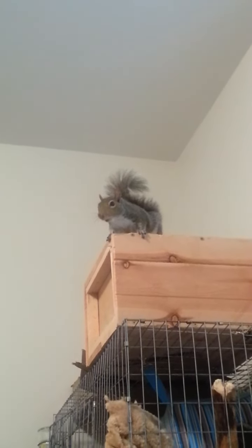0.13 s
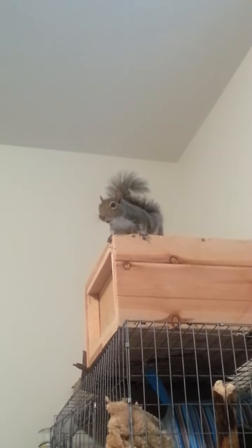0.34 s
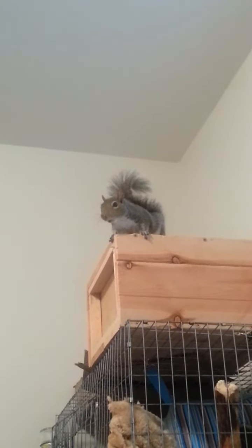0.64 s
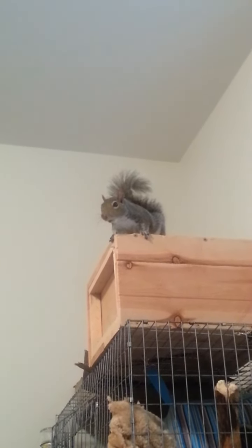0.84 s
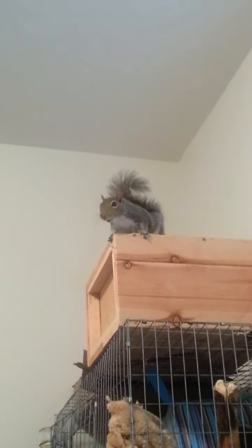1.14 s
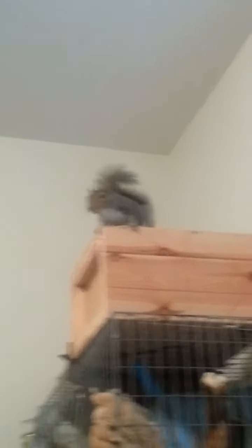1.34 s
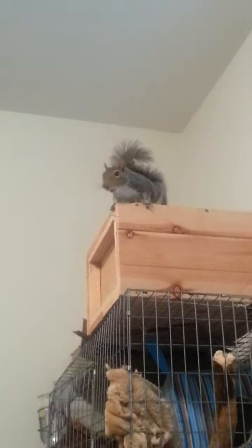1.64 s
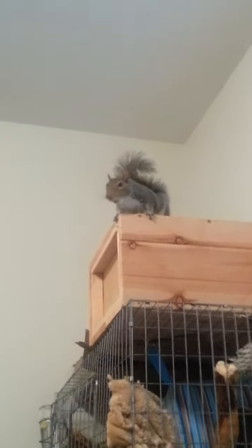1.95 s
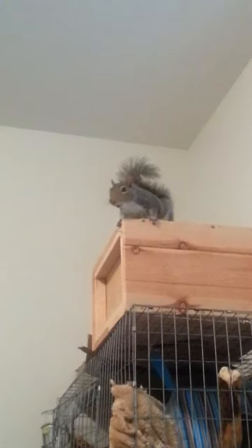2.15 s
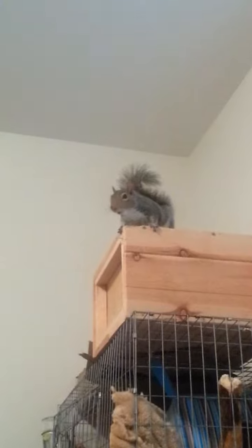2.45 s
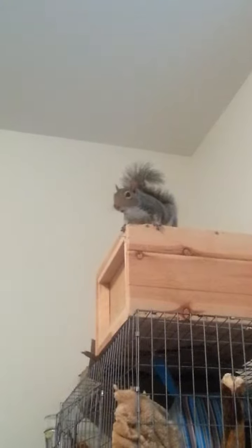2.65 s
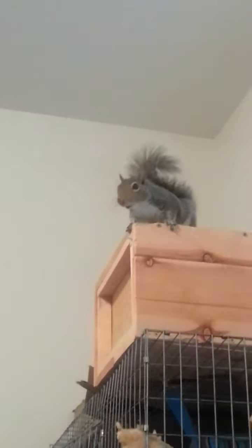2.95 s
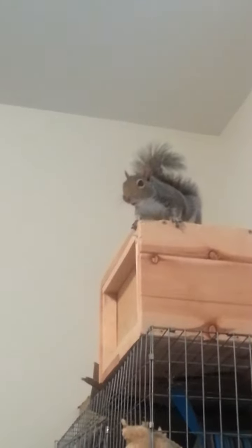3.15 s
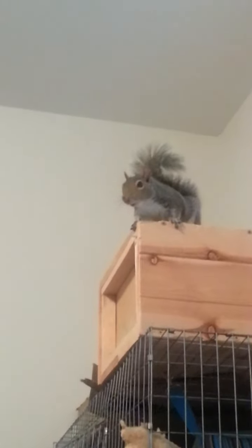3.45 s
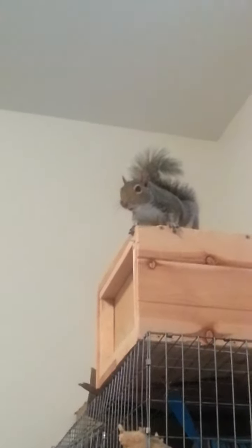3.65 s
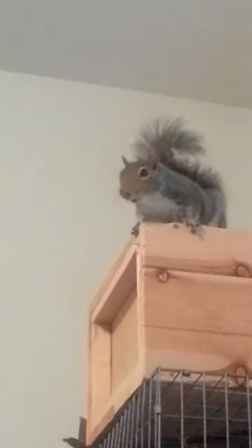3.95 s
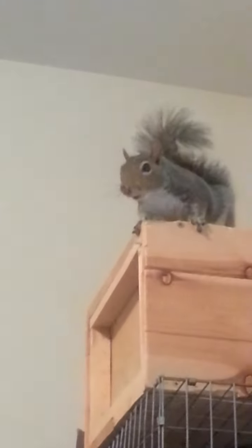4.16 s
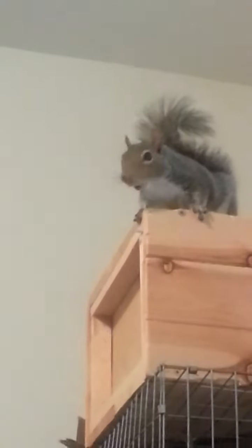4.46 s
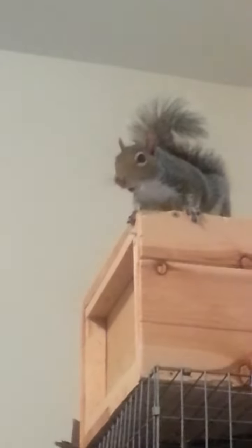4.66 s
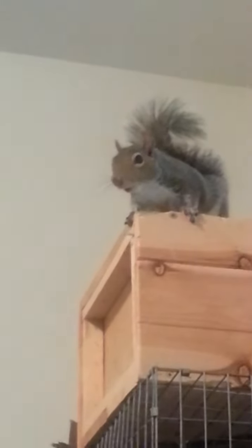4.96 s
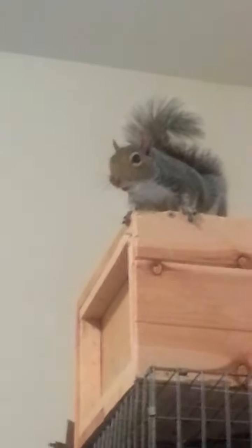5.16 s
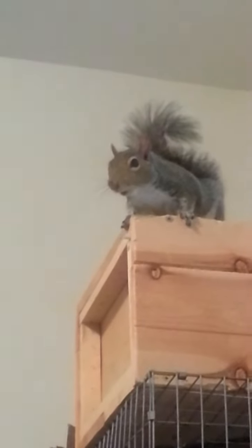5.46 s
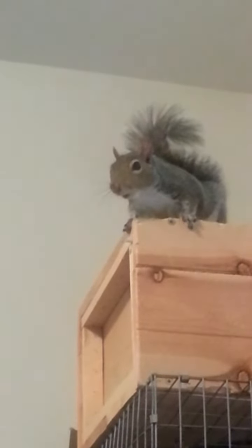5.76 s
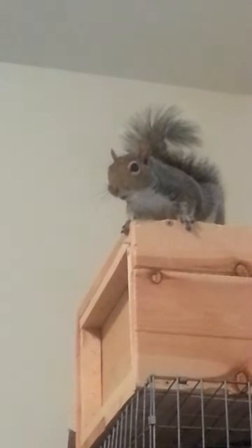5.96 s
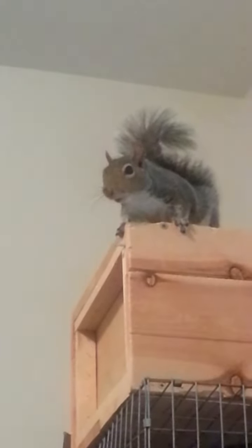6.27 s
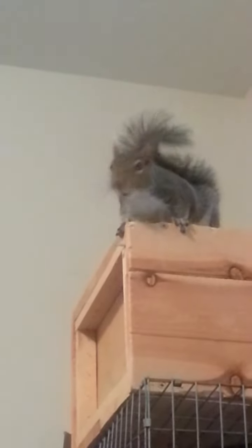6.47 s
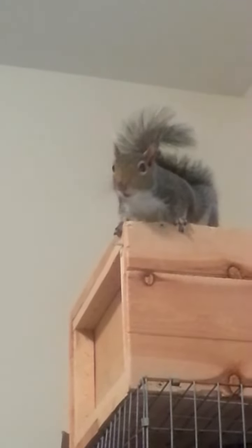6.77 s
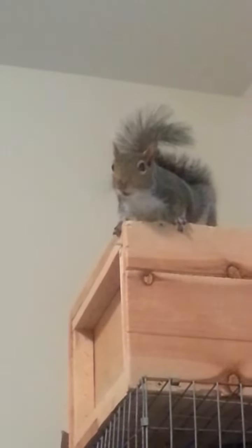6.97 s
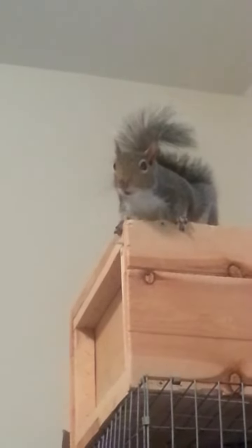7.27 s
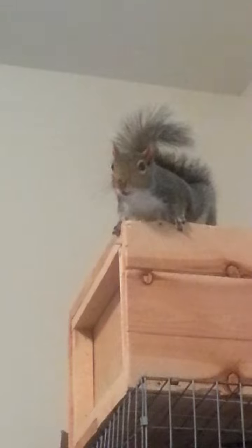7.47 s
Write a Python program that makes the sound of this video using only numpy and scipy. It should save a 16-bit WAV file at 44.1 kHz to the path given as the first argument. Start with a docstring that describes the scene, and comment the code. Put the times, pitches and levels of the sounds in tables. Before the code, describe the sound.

A young squirrel indoors gives two long harsh screeches sinking into thin whines, then three short hoarse barks, over faint room rumble and hiss.

```python
"""A faint room rumble and hiss come first, with a soft rush that fades; a sharp tick and a duller one follow.
A young squirrel then scolds: two long calls start as a harsh screech and sink into a clearer whine.
Three short hoarse barks end the scene. Each voice is made of pulses and air noise sent through resonances.
The background is shaped noise and a low hum, the ticks are ringing clicks, and echoes place the squirrel in a room.
"""
import sys
import numpy as np
from scipy import signal
from scipy.fft import rfft, irfft, next_fast_len
from scipy.io import wavfile
from scipy.ndimage import uniform_filter1d

SR = 44100
rng = np.random.default_rng(int(sys.argv[2]) if len(sys.argv) > 2 else 0)


def dump_mix(stems):
    """Bounce the given channels to the path in sys.argv[1] as a 16-bit WAV at rate SR."""
    frames = np.atleast_2d(stems).T  # one column per channel
    limited = np.clip(frames, -1, 1)  # hard clip at full scale
    pcm = np.round(limited * 32767).astype(np.int16)
    wavfile.write(sys.argv[1], SR, pcm)


N = 335601
TIME = np.arange(N) / SR

# Colour of the steady room noise: pitch_hz, relative_level_db (per Hz)
ROOM_NOISE = [(15, -54), (25, -21), (40, -14), (63, -4), (111, -5.5), (229, -14), (545, -23), (887, -21),
              (1260, -26), (1890, -28.5), (3430, -32), (5570, -31.5), (9320, -35), (14800, -34.5),
              (16000, -32)]
# Resonances of the soft rush: pitch_hz, width_hz, relative_level_db
RUSH_RESONANCES = [(73.5, 26, 1.5), (141.3, 26.3, 4), (219, 65, -7), (286.6, 8, 4.5), (520, 440, -17),
                   (1145, 680, -13), (2320, 4200, -27)]
# Swells of the low hum: start_s, length_s, level_db
HUM_SWELLS = [(3.655, 0.6, -46.5), (4.5, 0.4, -47.5)]
# Resonances of the treble flicker: pitch_hz, width_hz, relative_level_db
FLICKER_RESONANCES = [(5580, 720, 3), (6010, 160, 1)]
# Ticks: start_s, relative_level_db, sharpness_hz (the click is dulled above this)
TICKS = [(1.4461, 3.5, 14700), (1.5043, -11, 2400)]
# What a tick rings with: pitch_hz, width_hz, relative_level_db
TICK_RESONANCES = [(767, 740, -4), (2450, 890, -1.5), (4940, 910, 6.5), (6740, 1000, -31),
                   (9250, 580, -15.5), (13700, 2500, -11)]
# Long calls: start_s, length_s, relative_level_db, top_pitch_hz, final_mouth_hz,
# relative_mouth_ring_db, whine_clearness (0 to 1)
LONG_CALLS = [(1.531, .592, -20, 846.8, 3970, -1.5, 0.77), (4.255, .655, -20.5, 835.2, 3670, -2, .88)]
# Throat resonances in a long call: pitch_hz, width_hz, relative_level_db
CALL_THROAT = [(415, 90, -19), (713, 450, -21.5), (970, 120, -20.5), (1276, 243, -20.5), (2019, 253, 1.5),
               (2366, 307, -1.5), (2770, 550, -3.5), (3700, 1300, -20.5), (5370, 4700, -30.5),
               (8700, 1350, -30), (11140, 2000, -41)]
# Hiss of air past the teeth: pitch_hz, width_hz, relative_level_db
TEETH = [(8560, 990, 16), (11500, 3200, 4.5)]
# Resonances that come up as the jaws part: pitch_hz, width_hz, relative_level_db
JAWS = [(3146, 630, 8), (4410, 990, -10.5)]
# Weight of the lowest partials of the chest tone: pitch_hz, relative_level_db
CHEST_WEIGHT = [(300, -9.5), (400, -17), (490, -8), (560, 6.5), (700, 8), (880, -28), (980, 7.5), (1040, 0),
                (1120, -4), (1280, -8), (1450, -1), (1650, 3.5), (2600, -18)]
# Barks: start_s, length_s, relative_level_db, relative_squeak_db, mouth_brightness_db
BARKS = [(6.47, .108, -27.5, 9.5, -1.5), (6.803, .094, -28.5, 8.5, -2), (7.209, .1, -28, 9.5, -2.5)]
# Throat resonances in a bark: pitch_hz, width_hz, relative_level_db
BARK_THROAT = [(356, 166, -10.5), (637, 170, -3.5), (907, 178, 2), (1500, 540, -5.5), (2030, 347, 4.5)]
# Bright mouth resonances in a bark: pitch_hz, width_hz, relative_level_db
BARK_MOUTH = [(2980, 700, 2), (3830, 1840, -9.5), (6730, 2600, -13.5), (11000, 3800, -17)]
# Resonances of the squeak that closes a bark: pitch_hz, width_hz, relative_level_db
SQUEAK_RESONANCES = [(2320, 340, 4), (2690, 200, -6.5)]
# Time for the echoes to die by 60 dB: pitch_hz, decay_s
ECHO_DECAY = [(200, 0.41), (800, 0.36), (1700, 0.37), (2600, 0.35), (4500, 0.35), (14000, 0.21)]
# How alike left and right are in diffuse sound: pitch_hz, correlation (no unit)
LIKENESS = [(40, 0.85), (250, 0.69), (650, 0.37), (1200, 0.054), (2300, 0.2), (6000, 0), (15000, 0)]
# The squirrel's balance: pitch_hz, left_minus_right_db
BALANCE = [(300, -1.5), (740, 2.5), (1200, 1), (2100, -3.5), (3300, 0.5), (5500, 2.5), (9000, 2),
           (15000, 1.5)]

# The rush holds, then fades to a resting level
RUSH_DB, RUSH_HOLD_S, RUSH_FADE_DB_PER_S, RUSH_REST_DB = -46.5, 0.53, 5.5, -61.5
HUM_HZ, HUM_REST_DB, HUM_FADE_S = 56.0, -62, 0.11
FLICKER_DB, FLICKER_DEPTH_DB, FLICKER_RATE_HZ = -79, 13.5, 48

# Pitch of a long call: starts low, leaps to its top, holds, then sags as the air runs out
START_HZ, LEAP_AT_S, LEAP_S = 505.7, .02, .06
HOLD_SHARE, SAG_SHARE, SLACK_HZ = .23, .55, 349.5  # shares of the call's length; pitch it sags towards
# Effort: swells, tires towards the end, is let go
SWELL_DB, SWELL_S, TIRING_DB, TIRING_POWER = 8.5, 0.074, 11.5, 3.37
RELEASE_S, RELEASE_DB = 0.047, 17
# Folds: harsh, more so when effort is low, cleared by a whine late in the call (roughness and doubling 0 to 1)
HARSH, ROUGH_CHANGE_PER_DB, DOUBLING, DOUBLING_FADE_S = .84, -0.08, 0.58, 0.14
WHINE_AT_SHARE, WHINE_WIDTH_SHARE = .78, 0.1106
# Mouth: opens ever faster; its ring comes in after the start and then weakens
MOUTH_START_HZ, WIDE_OPEN_HZ, OPENING_POWER = 2650, 3990, 1.77
RING_SWELL_DB, RING_SWELL_S, RING_TIRING_DB = 15.5, 0.055, 7.5
# The chest tone stays level, with a lift when the voice starts and ends
CHEST_DB, CHEST_EDGE_DB, CHEST_EDGE_S = -49, 5, 0.042

# A bark's pitch drops quickly while the folds break up
BARK_START_HZ, BARK_END_HZ, BARK_DROP_S = 649.5, 471, .022
BARK_START_ROUGH, BARK_ROUGH, BARK_BREAK_S = 0.51, .95, 0.0243
# Its rasp: attack, hold, release
RASP_DB, RASP_ATTACK_S, RASP_ATTACK_DB = 1.5, 0.026, 13
RASP_HOLD_SHARE, RASP_RELEASE_DB_PER_S = 0.66, 282
# Its squeak: rises to a peak late in the bark and dies
SQUEAK_AT_SHARE, SQUEAK_RISE_DB_PER_S, SQUEAK_FALL_DB_PER_S = 0.81, 330, 750
# Its opening note: dies down to a faint undertone
NOTE_DB, NOTE_FALL_DB_PER_S, UNDERTONE_DB = -9, 600, -23
BARK_RUN_OUT_S = .02


def from_db(db):
    """Turn decibels into a gain."""
    return 10 ** (np.asarray(db) / 20)


def rms_one(x):
    """Scale to an average power of one."""
    return x / np.sqrt(np.mean(x ** 2) + 1e-20)


def ramp(x):
    """Follow x from 0 to 1, and hold it there beyond either end."""
    return np.clip(x, 0, 1)


def at_hz(points, hz):
    """Read between table rows, with frequency spaced as musical steps."""
    table_hz, value = np.transpose(points)
    return np.interp(np.log(np.maximum(hz, 1)), np.log(table_hz), value)


def colour(x, gain_at):
    """Smooth equaliser: multiply each frequency by its own gain."""
    size = next_fast_len(x.shape[-1] + 2048)
    hz = np.arange(size // 2 + 1) * SR / size
    return irfft(rfft(x, size) * gain_at(hz), size)[..., :x.shape[-1]]


def low_pass(x, cutoff_hz):
    """Take away what lies above a cutoff."""
    return signal.sosfilt(signal.butter(2, cutoff_hz, fs=SR, output="sos"), x)


def band_pass(x, edges_hz):
    """Keep what lies between two frequencies."""
    return signal.sosfilt(signal.butter(2, edges_hz, "band", fs=SR, output="sos"), x)


def drift(rate_hz, size):
    """Smooth random wandering with an average power of one."""
    r = np.exp(-2 * np.pi * rate_hz / SR)
    wander = signal.lfilter([1], [1, -2 * r, r * r], rng.standard_normal(2 * size))
    return rms_one(wander[size:])


def resonate(x, resonances):
    """Add steep-sided resonances side by side; white noise keeps about the same power."""
    out, power = 0, 0
    for k, (hz, width_hz, db) in enumerate(resonances):
        edges_hz = np.clip([hz - width_hz / 2, hz + width_hz / 2], [20, 30], [.46 * SR, .48 * SR])
        sign = (-1) ** k  # every other resonance is turned upside down
        out = out + sign * from_db(db) * band_pass(x + 1e-18, edges_hz)
        power += from_db(db) ** 2 * 2 * width_hz / SR
    return out / np.sqrt(power)


def glide(x, hz, width_hz):
    """A resonance whose centre moves: shift it down to zero, filter, and shift it back."""
    turn = np.exp(2j * np.pi * np.cumsum(hz) / SR)
    held = low_pass(x / turn, width_hz / 2)
    return np.real(held * turn) * np.sqrt(2 * SR / width_hz)


def diffuse(size):
    """Stereo noise from all around: alike in the bass, unrelated in the high treble."""
    mid, side = rng.standard_normal((2, size))
    alike = lambda hz: np.clip(at_hz(LIKENESS, hz), -1, 1)
    shared = colour(mid, lambda hz: np.sqrt(1 + alike(hz)))
    opposed = colour(side, lambda hz: np.sqrt(1 - alike(hz)))
    return shared + opposed * [[1], [-1]]


def add(out, start_s, sound):
    """Mix a sound in at its start time."""
    start = int(round(start_s * SR))
    out[start:start + len(sound)] += sound[:N - start]


def gate(t, fade_s):
    """Short fades at both ends."""
    return ramp(np.minimum(t - t[0], t[-1] - t) / fade_s)


def room_noise():
    """Steady rumble and hiss: diffuse noise given the room's colour."""
    return from_db(-48.5) * rms_one(colour(diffuse(N), lambda hz: from_db(at_hz(ROOM_NOISE, hz))))


def fading_rush():
    """A soft rush: resonant noise that holds, then sinks by a steady number of decibels a second."""
    fade_db = RUSH_FADE_DB_PER_S * np.maximum(TIME - RUSH_HOLD_S, 0)
    rush_db = np.maximum(RUSH_DB - fade_db, RUSH_REST_DB)
    return from_db(rush_db) * rms_one(resonate(diffuse(N), RUSH_RESONANCES))


def wavering_hum():
    """A low steady pitch whose loudness wavers, with two swells."""
    strength = from_db(HUM_REST_DB)
    for start, length, db in HUM_SWELLS:
        strength = strength + from_db(db) * ramp(np.minimum(TIME - start, start + length - TIME) / HUM_FADE_S)
    waver = from_db(2 * drift(5.4, N))  # decibels around the middle; rate in Hz
    return strength * waver * np.sin(2 * np.pi * HUM_HZ * TIME)


def treble_flicker():
    """Faint treble noise whose loudness flickers at random."""
    level_db = FLICKER_DB + FLICKER_DEPTH_DB * np.tanh(drift(FLICKER_RATE_HZ, N))
    return from_db(level_db) * resonate(diffuse(N), FLICKER_RESONANCES)


def background(low_cut_hz=33):
    """Room noise, rush, hum and flicker together, without the very lowest bass."""
    sound = room_noise() + fading_rush() + wavering_hum() + treble_flicker()
    return signal.sosfilt(signal.butter(2, low_cut_hz, "high", fs=SR, output="sos"), sound)


def ticks(pan_db=-3, level_db=-3):
    """Short dry ticks, louder on the right: a contact sets resonances ringing; a softer one is duller."""
    out, click = np.zeros(N), signal.unit_impulse(2048)
    for start, db, sharp_hz in TICKS:
        contact = low_pass(click, min(sharp_hz, .45 * SR))
        add(out, start, from_db(db + level_db) * resonate(contact, TICK_RESONANCES))
    return out * from_db([[pan_db], [-pan_db]])


def fold_pulses(pitch, cycles, doubling):
    """One pulse each time the vocal folds close; doubling makes them strong, weak, strong."""
    at = np.flatnonzero(np.diff(np.floor(cycles)) > 0)
    # where between two samples the closure falls
    late = (np.floor(cycles[at + 1]) - cycles[at]) / (cycles[at + 1] - cycles[at])
    swing = doubling[at] * (-1) ** np.arange(len(at))
    strength = np.sqrt(SR / pitch[at] / (1 + swing ** 2)) * (1 + swing)
    pulses = np.zeros(len(pitch))
    pulses[at] += strength * (1 - late)
    pulses[at + 1] += strength * late
    return pulses


def chest_tone(pitch, cycles, rough, doubling, stray):
    """The lowest partials as sine waves; doubling adds lines halfway between them."""
    def partial(k):
        phase = 2 * np.pi * k * cycles + stray * rough * drift(61.6, len(pitch))
        return from_db(at_hz(CHEST_WEIGHT, k * pitch)) * np.sqrt(2) * np.sin(phase)

    return sum(partial(k) + doubling * partial(k - .5) for k in range(1, 4))


def folds(pitch, rough, doubling, jitter, air, flutter_db, flutter_hz, chest_stray):
    """Vocal folds: pulses and air puffs make a buzz beside a chest tone; roughness scatters both."""
    size, rough, doubling = len(pitch), ramp(rough), ramp(doubling)
    cycles = np.cumsum(pitch * (1 + jitter * rough * drift(220.4, size))) / SR
    pulses = fold_pulses(pitch, cycles, doubling)
    puffs = rms_one(rng.standard_normal(size) * (1 + np.cos(2 * np.pi * cycles)))
    air_share = ramp(air * rough)
    buzz = np.sqrt(1 - air_share) * pulses + np.sqrt(air_share) * puffs
    tone = chest_tone(pitch, cycles, rough, doubling, chest_stray)
    # loose tissue chops the airflow; the average power is evened out
    flutter = from_db(flutter_db * rough * np.tanh(drift(flutter_hz, size)))
    flutter = flutter / np.sqrt(uniform_filter1d(flutter ** 2, size=700))
    return flutter * buzz, flutter * tone


def call_folds(age, length, top_hz, effort_db, clearness):
    """Pitch, roughness and doubling: the pitch sags as air runs out, and a whine clears the harshness."""
    share = ramp(age / length)
    sag = np.exp(-np.maximum(share - HOLD_SHARE, 0) / SAG_SHARE)
    sagging_hz = SLACK_HZ + (top_hz - SLACK_HZ) * sag
    pitch = START_HZ + (sagging_hz - START_HZ) * ramp((age - LEAP_AT_S) / LEAP_S)
    whine = clearness * ramp(1.5 - np.abs(share - WHINE_AT_SHARE) / WHINE_WIDTH_SHARE)
    # effort_db is at most zero, so weaker effort is rougher
    rough = ramp((HARSH + ROUGH_CHANGE_PER_DB * effort_db) * (1 - whine))
    return pitch, rough, DOUBLING * ramp((length - age) / DOUBLING_FADE_S)


def call_mouth(jet, mouth_hz, ring_db):
    """The mouth rings at a moving pitch, with an upper ring that grows as it opens and a hiss at the teeth."""
    main = glide(jet, mouth_hz, width_hz=560)
    upper_gain = from_db(-13) * (mouth_hz / WIDE_OPEN_HZ) ** 4.8
    upper = upper_gain * glide(jet, 1.54 * mouth_hz, width_hz=1300)
    teeth = from_db(-16) * resonate(jet, TEETH)
    return from_db(ring_db - 4) * (main + upper + teeth)


def long_calls(jet_share=0.37):
    """Drawn-out screeches: the pitch sinks, a whine clears the harshness and the mouth rings higher as it opens."""
    out = np.zeros(N)
    for start, length, level_db, top_hz, open_hz, ring_db, clearness in LONG_CALLS:
        t = TIME[(TIME >= start) & (TIME <= start + length)]
        age, left = t - start, start + length - t
        share = age / length
        effort_db = -SWELL_DB * np.exp(-age / SWELL_S) - TIRING_DB * share ** TIRING_POWER
        call_ring_db = ring_db - RING_SWELL_DB * np.exp(-age / RING_SWELL_S) - RING_TIRING_DB * share
        chest_db = CHEST_DB + CHEST_EDGE_DB * ramp(2 - np.minimum(age, left) / CHEST_EDGE_S)
        mouth_hz = MOUTH_START_HZ + (open_hz - MOUTH_START_HZ) * share ** OPENING_POWER

        pitch, rough, doubling = call_folds(age, length, top_hz, effort_db, clearness)
        buzz, tone = folds(pitch, rough, doubling, jitter=.06, air=0.79,
                           flutter_db=4.5, flutter_hz=218, chest_stray=0.58)
        jet = buzz + jet_share * rough * rng.standard_normal(len(t))  # air rushing past the teeth
        mouth = call_mouth(jet, mouth_hz, call_ring_db)
        jaws = from_db(-6) * share ** 2 * resonate(buzz, JAWS)
        throat = from_db(effort_db) * resonate(buzz, CALL_THROAT)
        voice = from_db(level_db) * (throat + mouth + jaws) + from_db(chest_db) * tone
        release = from_db(-RELEASE_DB * ramp(1 - left / RELEASE_S))
        add(out, t[0], voice * release * gate(t, fade_s=0.0053))
    return out


def barks():
    """Each bark opens on a low note, breaks into a rasp as the folds roughen, and closes with a squeak."""
    out = np.zeros(N)
    for start, length, level_db, squeak_peak_db, bright_db in BARKS:
        t = TIME[(TIME >= start) & (TIME <= start + length + BARK_RUN_OUT_S)]
        age = t - start
        pitch = BARK_END_HZ + (BARK_START_HZ - BARK_END_HZ) * np.exp(-age / BARK_DROP_S)
        rough = BARK_START_ROUGH + (BARK_ROUGH - BARK_START_ROUGH) * ramp(age / BARK_BREAK_S)
        attack_db = RASP_ATTACK_DB * ramp(1 - age / RASP_ATTACK_S)
        release_db = RASP_RELEASE_DB_PER_S * np.maximum(age - RASP_HOLD_SHARE * length, 0)
        rasp_db = RASP_DB - attack_db - release_db
        past_peak = age - SQUEAK_AT_SHARE * length
        slope_db = np.minimum(SQUEAK_RISE_DB_PER_S * past_peak, -SQUEAK_FALL_DB_PER_S * past_peak)
        note_db = np.maximum(NOTE_DB - NOTE_FALL_DB_PER_S * age, UNDERTONE_DB)

        buzz, tone = folds(pitch, rough, rough / 2, jitter=.13, air=0.81,
                           flutter_db=8.0, flutter_hz=170, chest_stray=0.35)
        mouth = [(hz, width_hz, db + bright_db) for hz, width_hz, db in BARK_MOUTH]
        rasp = from_db(rasp_db) * resonate(buzz, BARK_THROAT + mouth)
        squeak = from_db(squeak_peak_db + slope_db) * resonate(buzz, SQUEAK_RESONANCES)
        voice = rasp + squeak + from_db(note_db) * tone
        add(out, t[0], from_db(level_db) * voice * gate(t, fade_s=0.005))
    return out


def echo_tail(t):
    """Late echoes: noise split into bands, each dying at its own speed."""
    noise, tail = diffuse(len(t)), 0
    edges = np.geomspace(120, 16000, 13)
    for low, high in zip(edges, edges[1:]):
        decay_s = at_hz(ECHO_DECAY, np.sqrt(low * high))
        tail = tail + band_pass(noise, [low, high]) * from_db(-60 * t / decay_s)
    return tail * (1 - np.exp(-t / 0.0043))  # builds up over a few milliseconds


def room(x, early_s=0.014, right_lag_s=0.00011):
    """Direct sound reaching the right a little later, a flurry of early echoes, and a dying tail."""
    t = TIME[:int(.7 * SR)]
    tail = echo_tail(t)
    early = diffuse(len(t)) * np.exp(-t / early_s) * (t > .002)
    echoes = (from_db(-5) * rms_one(early) + from_db(-6) * rms_one(tail)) / np.sqrt(len(t))
    right = colour(x, lambda hz: np.exp(-2j * np.pi * hz * right_lag_s))
    direct = from_db(-4) * np.array([x, right])
    heard = direct + signal.fftconvolve(x[None], echoes, axes=1)[:, :N]
    return colour(heard, lambda hz: from_db(at_hz(BALANCE, hz) * np.array([[.5], [-.5]])))


def scene(squirrel_db=2):
    """The background, the ticks and the squirrel in its room."""
    squirrel = room(long_calls() + barks())
    return background() + ticks() + from_db(squirrel_db) * squirrel


def record(dry):
    """Cut the top steeply above 15550 Hz."""
    return signal.sosfilt(signal.ellip(10, .1, 80, 15550, fs=SR, output="sos"), dry)


dry = scene()
out = record(dry)
dump_mix(out)
```